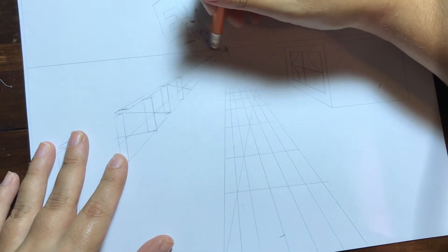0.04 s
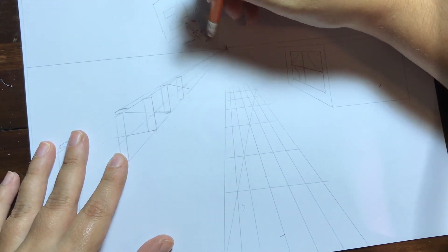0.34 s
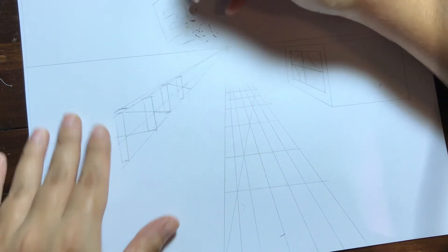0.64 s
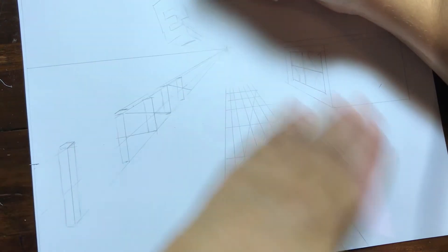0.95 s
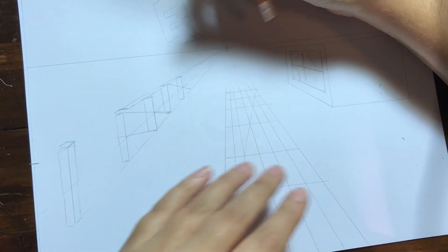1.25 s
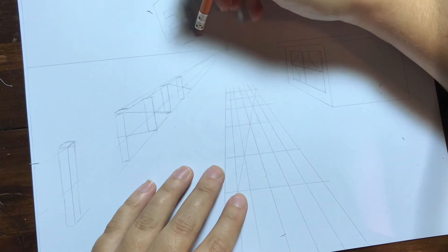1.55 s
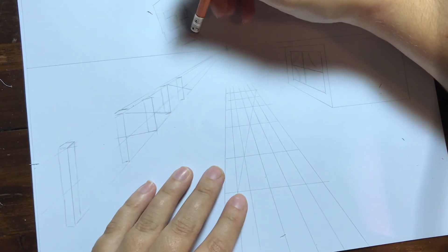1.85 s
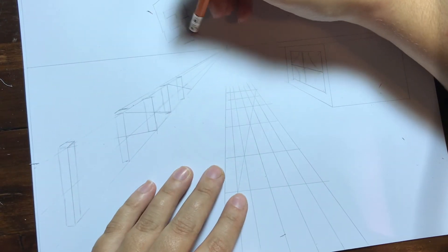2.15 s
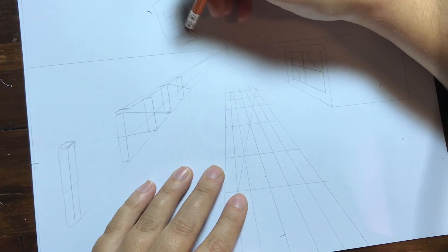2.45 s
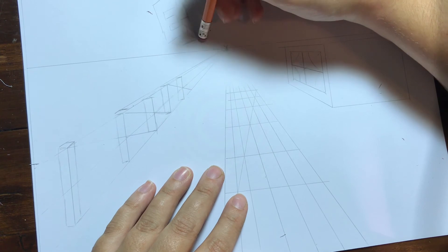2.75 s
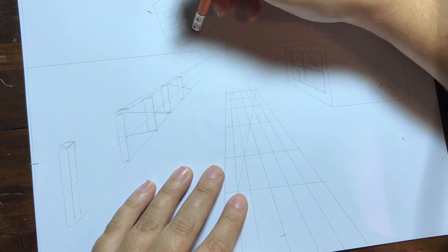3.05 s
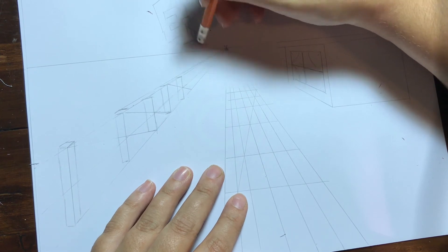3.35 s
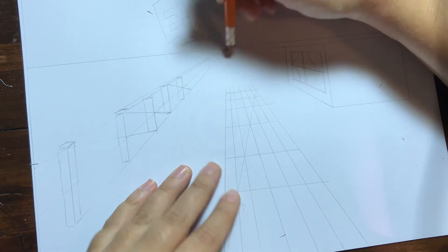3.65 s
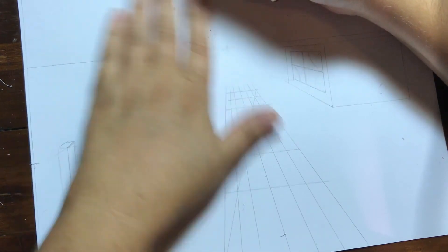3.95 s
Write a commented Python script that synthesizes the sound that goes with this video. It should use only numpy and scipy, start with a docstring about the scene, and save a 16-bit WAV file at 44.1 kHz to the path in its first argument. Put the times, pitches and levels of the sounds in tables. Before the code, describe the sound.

An eraser rubs paper in quick, soft strokes, then a palm sweeps the sheet with a louder hiss. A longer run and another sweep follow, with light pencil clicks and table bumps, heard close in a quiet room.

```python
"""A wooden table in a quiet room, where a fan hums over low drones and a faint hiss.
An eraser rubs a sheet of paper in quick back-and-forth strokes: the rubber slips over the fibres
and sets its pencil ringing, while the side of the hand drags along. Between runs the hands slide,
the pencil knocks as the grip shifts, and the other palm sweeps the crumbs off with a hiss.
Crumbs and the paper's edge tick, and the table top thumps softly where a hand lands."""
import sys
import numpy as np
from scipy import signal
from scipy.fft import rfft, irfft
from scipy.io import wavfile

SR = 44100
rng = np.random.default_rng(int(sys.argv[2]) if len(sys.argv) > 2 else 0)


def dump(signal):
    """Clip the signal to [-1, 1] and save it as 16-bit WAV at the path in sys.argv[1]."""
    limited = np.clip(np.atleast_2d(signal).T, -1, 1)
    pcm = np.round(limited * 32767).astype(np.int16)
    wavfile.write(sys.argv[1], SR, pcm)


N = 176400
T = np.arange(N) / SR
CUTOFF_HZ = 15850


def from_db(db):
    """Decibels to gain."""
    return 10 ** (np.asarray(db) / 20)


def unit_rms(x):
    """Scale to rms 1."""
    return x / np.sqrt(np.mean(x ** 2) + 1e-20)


def colour(x, spectrum):
    """EQ a steady sound along a curve, rolling off below its first point; rms 1."""
    hz, db = np.transpose(spectrum)
    f = np.maximum(np.fft.rfftfreq(N, 1 / SR), 1)
    curve = from_db(np.interp(np.log(f), np.log(hz), db))
    band = np.minimum(f / hz[0], 1) ** 2 * (f < CUTOFF_HZ + 500)
    return unit_rms(irfft(rfft(x) * curve * band, N))


def split(x, crossover_hz=6770):
    """Divide a sound into body and treble."""
    f = np.fft.rfftfreq(N, 1 / SR)
    body = irfft(rfft(x) / (1 + (f / crossover_hz) ** 6), N)
    return body, x - body


def drift(rate_hz):
    """Smooth random modulation; rms 1."""
    f = np.fft.rfftfreq(N, 1 / SR)
    return unit_rms(irfft(rfft(rng.standard_normal(N)) * (f > 0) / (1 + (f / rate_hz) ** 4), N))


def tone(hz, wander):
    """A sine whose pitch wanders by a small fraction; rms 1."""
    cycles = rng.random() + np.cumsum(hz * (1 + wander * drift(1.22))) / SR
    return np.sqrt(2) * np.sin(2 * np.pi * cycles)


def resonate(x, hz, *widths_hz):
    """Band-pass resonators in series, one for each width; rms 1."""
    for width in widths_hz:
        r = np.exp(-np.pi * width / SR)
        feedback = [1, -2 * r * np.cos(2 * np.pi * hz / SR), r * r]
        x = signal.lfilter(np.array([1, 0, -1]) * (1 - r * r) / 2, feedback, x + 1e-18)
    return unit_rms(x)


def strike(mode, times, hits_db):
    """One decaying mode, struck at each of the times."""
    hz, db, t60 = mode
    force = np.zeros(N)
    force[(times * SR).astype(int)] = from_db(hits_db)
    r, w = np.exp(-np.log(1000) / (t60 * SR)), 2 * np.pi * hz / SR
    return from_db(db) * signal.lfilter([0, np.sin(w)], [1, -2 * r * np.cos(w), r * r], force + 1e-18)


def slips(grain_db):
    """Friction noise: dense tiny slips over paper fibres, of uneven size."""
    return unit_rms(rng.standard_normal(N) * from_db(grain_db * np.minimum(rng.exponential(1, N), 5)))


def arch(start, length):
    """Envelope of a move that speeds up and slows down."""
    u = np.clip((T - start) / length, 0, 1)
    return 4 * u * (1 - u)


def burst(start, decay_s):
    """Envelope with an instant attack and an exponential decay."""
    return (T >= start) * np.exp(-np.maximum(T - start, 0) / decay_s)


# Each row: multiple of the fan's turning rate, level in dB.
FAN_HARMONICS = [(3, -58), (5, -67), (6, -54.5), (8, -66.5), (9, -69.5), (10, -71.5)]
# The room's other drones. Each row: pitch in Hz, level in dB.
ROOM_DRONES = [(79.5, -57), (100, -66)]
def hum(fan_hz=22.86, waver_db=1):
    """The fan hums at multiples of its turning rate beside two low drones; each tone wavers."""
    tones = [(k * fan_hz, db) for k, db in FAN_HARMONICS] + ROOM_DRONES
    return sum(tone(hz, wander=0.0015) * from_db(db + waver_db * drift(7.3)) for hz, db in tones)


# The rumble's fader. Each row: time in seconds, relative level in dB.
RUMBLE_FADER = [(0.0, -52), (0.29, -59), (0.77, -46), (0.83, -58.5), (1.01, -48), (1.12, -65), (1.18, -49),
                (1.65, -53.5), (1.69, -61), (1.83, -45), (2.0, -56), (2.75, -49), (3.1, -56.5), (3.23, -44),
                (3.33, -56), (3.44, -46.5), (3.94, -58.5), (4.0, -65)]
def rumble():
    """The deepest drone swells and sinks, unsteady in pitch."""
    fader_db = np.interp(T, *np.transpose(RUMBLE_FADER))
    return tone(44.9, wander=0.026) * from_db(0.5 + fader_db)


# Room tone. Each row: frequency in Hz, relative level in dB.
AIR_EQ = [(22, -103), (32, -86.5), (55, -78.5), (110, -73), (160, -79.5), (230, -83), (290, -89),
          (400, -88.5), (500, -101), (820, -95.5), (1050, -97), (1250, -102), (1550, -102), (2100, -109),
          (3200, -113), (5000, -121), (8000, -124), (10500, -126), (12600, -117), (14000, -120),
          (15700, -121)]
def air():
    """A dark bed of moving air with a thin, steady hiss high above it."""
    bed = colour(rng.standard_normal(N), AIR_EQ)
    hiss = resonate(rng.standard_normal(N), 13080, 410, 410)
    return from_db(-55) * bed + from_db(-82) * hiss


# Each row: start in seconds, length in seconds, level in dB, ring trim in dB, treble trim in dB.
ERASER_STROKES = [(0.002, 0.057, -66, 0.5, 7.5), (0.11, 0.054, -64, 3, 4.5), (0.184, 0.063, -65, -10.5, 0),
                  (0.287, .085, -59.5, -1.5, 2), (0.392, 0.078, -65, -1, 3), (0.493, 0.1, -59.5, -0.5, 2.5),
                  (1.618, 0.073, -71.5, 2.5, 2), (1.734, 0.052, -65, -8, -1), (1.866, 0.079, -63, -1.5, 0),
                  (1.966, 0.09, -63, -4.5, -0.5), (2.114, .072, -64.5, 1.5, 1), (2.21, .079, -64.5, -2, 1),
                  (2.347, 0.047, -64, 0.5, -3), (2.414, 0.1, -62, -0.5, 3), (2.753, 0.059, -78.5, 4.5, 10),
                  (2.843, 0.078, -68.5, -0.5, 1), (2.939, 0.087, -66.5, 3.5, 1), (3.048, 0.088, -63, -2, 0),
                  (3.166, 0.079, -61.5, 2, 1), (3.281, 0.083, -63, -1, 1.5), (3.389, 0.079, -65.5, 1.5, 2),
                  (3.491, 0.1, -61, 0, -0.5), (3.568, 0.068, -65, -3, 4)]
# Rubber on paper. Each row: frequency in Hz, relative level in dB.
RUBBER_EQ = [(250, -5), (600, 5), (1200, 11.5), (2500, 7.5), (4300, -1), (5100, -0.5), (6500, 2),
             (8000, -1.5), (10500, -5), (12500, 1), (15800, -13.5)]
# The rubbed pencil. Each row: centre in Hz, width in Hz, relative level in dB.
PENCIL_RESONANCES = [(1940, 270, -11.5), (3130, 190, -8.5), (3397, 320, 1), (4100, 340, -0.5),
                     (4530, 250, 2), (5880, 1000, -2), (6560, 370, -31), (8920, 400, -7.5)]
def eraser(detune=0.01, vary_db=1.5, judder_db=1.54):
    """Each stroke scuffs the paper and sets the pencil ringing, a little differently each time."""
    body, treble = split(colour(slips(grain_db=3.5), RUBBER_EQ))
    friction = slips(grain_db=3.5)
    out = np.zeros(N)
    for start, length, db, ring_db, treble_db in ERASER_STROKES:
        span = slice(int(start * SR), int((start + length) * SR))
        ring = 0
        for hz, width, mode_db in PENCIL_RESONANCES:
            shift, strength = rng.uniform(-1, 1, 2)
            mode = resonate(friction[span], hz * (1 + detune * shift), width, width)
            ring += from_db(mode_db + vary_db * strength) * mode
        pressure = arch(start, length)[span] ** 1.28
        scuff = body[span] + from_db(treble_db) * treble[span]
        out[span] += from_db(db) * pressure * (scuff + from_db(ring_db) * unit_rms(ring))
    return out * from_db(-4 + judder_db * drift(60))


# Each row: start in seconds, length in seconds, level in dB.
HAND_DRAGS = [(.05, 0.52, -79), (1.71, .85, -75), (3.096, 0.64, -75.5)]
# The dull scuff. Each row: frequency in Hz, relative level in dB.
DRAG_EQ = [(500, -5), (1500, 5.5), (2700, 0), (3600, -5), (8000, -11.5), (15000, -11)]
def hand_drag():
    """The side of the rubbing hand scuffs the sheet under the runs of strokes."""
    envelope = sum(from_db(db) * arch(start, length) for start, length, db in HAND_DRAGS)
    return envelope * colour(slips(grain_db=2), DRAG_EQ)


# Each row: start in seconds, length in seconds, hiss in dB, rasp in dB.
HAND_SLIDES = [(.525, .17, -63.5, -69.5), (.66, 0.16, -75, -86), (0.956, .13, -74, -81),
               (0.997, 0.45, -73.5, -86), (1.363, .05, -74, -70.5), (1.402, 0.15, -76, -77),
               (3.631, 0.14, -58, -65.5), (3.735, 0.2, -73, -79)]
# A light touch, for slides and knock clicks. Each row: frequency in Hz, relative level in dB.
TOUCH_EQ = [(600, 1), (2600, -2.5), (3700, 0), (5000, 4.5), (7000, 3.5), (10000, 2), (12000, 3), (15700, 4)]
def hand_slides(rasp_hz=3590, width_hz=1030):
    """The hands glide softly over the paper, which rasps under the fingertips."""
    hiss = colour(slips(grain_db=4), TOUCH_EQ)
    rasp = resonate(slips(grain_db=6.5), rasp_hz, width_hz, 2 * width_hz)
    return sum(arch(start, length) * (from_db(hiss_db) * hiss + from_db(rasp_db) * rasp)
               for start, length, hiss_db, rasp_db in HAND_SLIDES)


# Each row: time in seconds, click in dB, ring in dB.
GRIP_KNOCKS = [(.547, -68, -67), (0.581, -61, -54.5), (0.5867, -62, -53), (.589, -63, -53.5),
               (3.629, -55, -62), (3.6334, -47.5, -57)]
# The knocked pencil. Each row: pitch in Hz, gain in dB, seconds to fall 60 dB.
PENCIL_MODES = [(870, 0.5, 0.03), (1300, -9, 0.017), (1666, -1, 0.043), (2100, -5, 0.024), (2980, 3, .02),
                (3360, -5.5, 0.029), (3600, -4.5, 0.024), (6000, -5, 0.009)]
def pencil_knocks(vary_db=4.5):
    """As the grip shifts, each contact clicks and rings the pencil with a fresh mix of modes."""
    times, _, ring_db = np.transpose(GRIP_KNOCKS)
    clicks = sum(from_db(db) * burst(start, decay_s=0.0031) for start, db, _ in GRIP_KNOCKS)
    out = clicks * colour(slips(grain_db=2.5), TOUCH_EQ)
    for k, mode in enumerate(PENCIL_MODES):
        hits_db = ring_db + vary_db * rng.standard_normal(len(times))
        out += (-1) ** k * strike(mode, times, hits_db)   # modes alternate in polarity
    return out


# Each row: time in seconds, then the hit on the deep, middle and upper mode in dB.
HAND_LANDINGS = [(.591, -51, -60, -62), (1.344, -45, -71, -79), (1.432, -44, -81, -84),
                 (1.91, -68, -54, -81), (2.051, -51, -55.5, -73.5), (3.325, -52, -77, -64.5),
                 (3.623, -45.5, -59, -75), (3.639, -52, -61, -57.5), (3.888, -39, -53.5, -68)]
# The table top. Each row: pitch in Hz, gain in dB, seconds to fall 60 dB.
WOOD_MODES = [(71.8, 3, 0.35), (330, 2.5, 0.11), (562.5, 6, 0.088)]
def table_bumps():
    """A hand lands and the table top answers, with its own balance of modes for each spot."""
    times, *hits_db = np.transpose(HAND_LANDINGS)
    return sum(strike(mode, times, db) for mode, db in zip(WOOD_MODES, hits_db))


# The palm's speed as a fader, one list a sweep. Each row: time in seconds, level in dB.
SWEEP_FADERS = [
    [(.769, -74), (.774, -59.5), (.797, -48), (.835, -47), (.872, -38.5), (.905, -38.5), (.95, -45.5),
     (.988, -60.5), (1.0, -64)],
    [(3.868, -81), (3.870, -56), (3.9, -46), (3.935, -42), (3.972, -39), (4.0, -41.5)],
]
# Skin on paper. Each row: frequency in Hz, relative level in dB.
SKIN_EQ = [(400, -26), (1200, -11), (2150, -11.5), (2400, -6.5), (3300, 1.5), (4400, 4.5), (5100, 0.5),
           (6000, 6), (7400, 2), (8000, 1.5), (9000, 6.5), (10500, -1.5), (12000, 3), (15700, 1.5)]
def palm_sweeps(release_s=0.019, brighten_above_db=-43.5):
    """The palm hisses across the sheet, louder and brighter the faster it moves."""
    body, treble = split(colour(slips(grain_db=1.5), SKIN_EQ))
    level = 0
    for fader in SWEEP_FADERS:
        times, db = np.transpose(fader)
        release = np.exp(-np.maximum(T - times[-1], 0) / release_s)
        level += from_db(np.interp(T, times, db)) * (T > times[0]) * release
    brightness = (level / from_db(brighten_above_db)) ** 0.27
    return level * (body + brightness * treble)


# Each row: time in seconds, level in dB.
CRUMB_TICKS = [(0.976, -35.5), (0.985, -46), (1.381, -62), (1.63, -66), (1.945, -76), (2.657, -73),
               (2.76, -71), (3.05, -61.5), (3.273, -67)]
# Their crisp top. Each row: frequency in Hz, relative level in dB.
TICK_EQ = [(5000, -3.5), (9000, -3), (15000, 1)]
def crumb_ticks():
    """Crumbs and the edge of the sheet flick under the hand."""
    envelope = sum(from_db(db) * burst(start, decay_s=0.0023) for start, db in CRUMB_TICKS)
    return envelope * colour(slips(grain_db=2.5), TICK_EQ)


def reflections(x, table_db=-11, table_decay_s=0.005, room_db=-21, room_t60_s=0.34):
    """Quick echoes off the table and a faint tail from the room."""
    t = T[:SR // 3]
    early = np.exp(-t / table_decay_s)
    tail = np.exp(-np.log(1000) * t / room_t60_s)
    response = 0
    for db, decay in ((table_db, early), (room_db, tail)):
        echoes = rng.standard_normal(len(t)) * decay * (t > 0.001)   # 1 ms pre-delay
        response += from_db(db) * echoes / np.sqrt(np.sum(echoes ** 2))
    return signal.fftconvolve(x, response)[:N]


def scene():
    """Close mono mix: paper and pencil with their echoes, over table bumps and room tone."""
    foley = eraser() + hand_drag() + hand_slides() + pencil_knocks() + palm_sweeps() + crumb_ticks()
    foley = from_db(-0.3) * (foley + reflections(foley))
    return (foley + table_bumps() + hum() + rumble() + air())[None]


def record(dry):
    """A steep low-pass takes off the very top."""
    return signal.sosfilt(signal.ellip(12, 0.1, 70, CUTOFF_HZ, fs=SR, output="sos"), dry)


dry = scene()
out = record(dry)
dump(out)
```